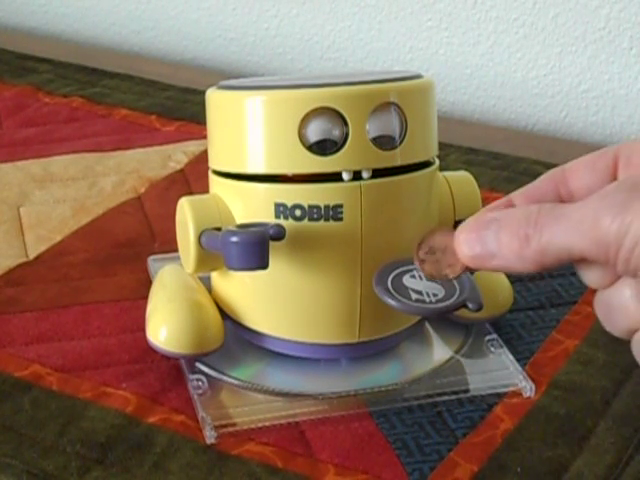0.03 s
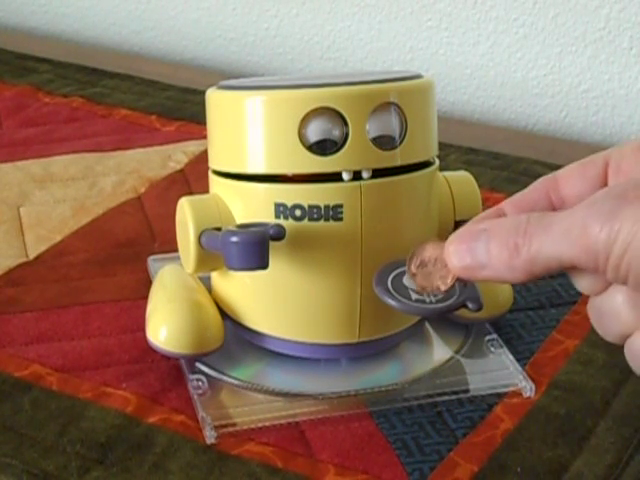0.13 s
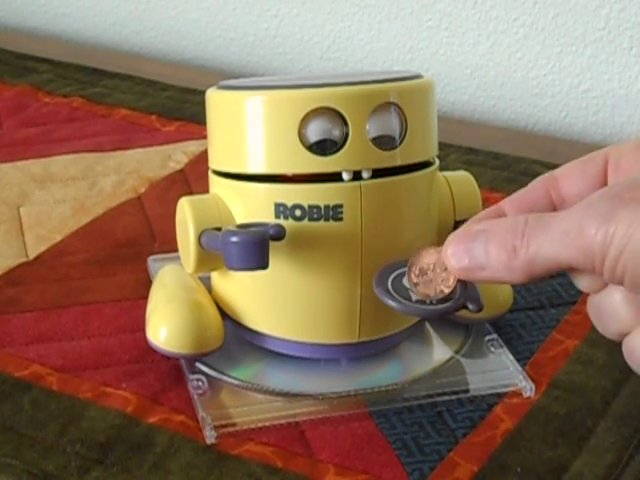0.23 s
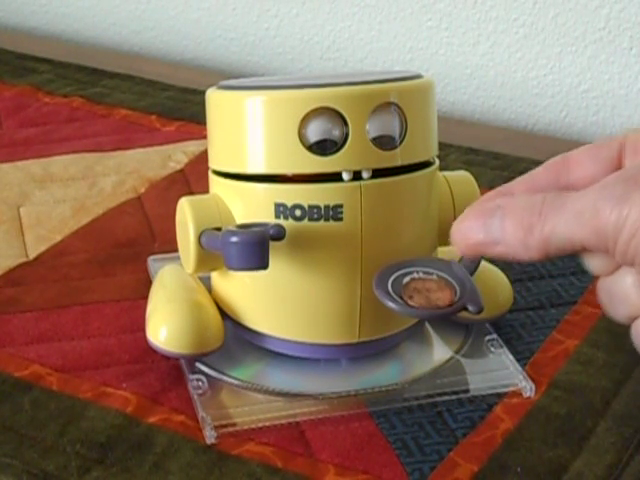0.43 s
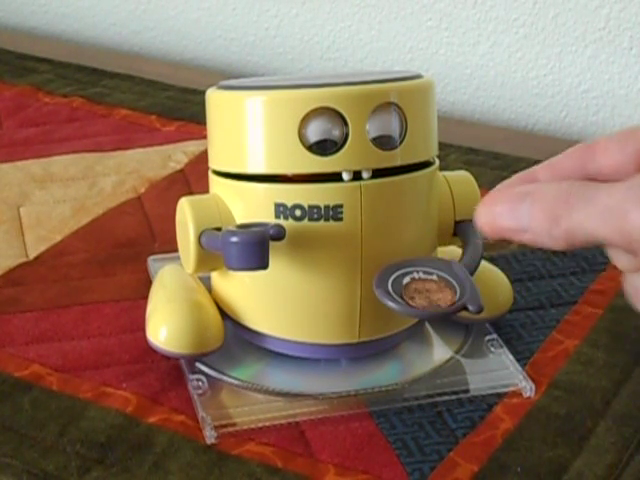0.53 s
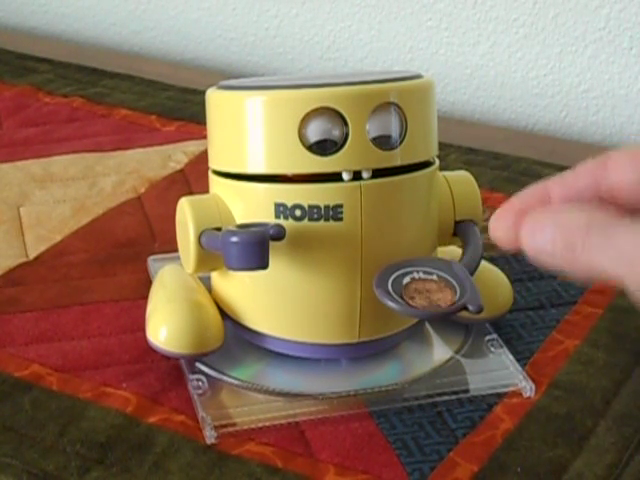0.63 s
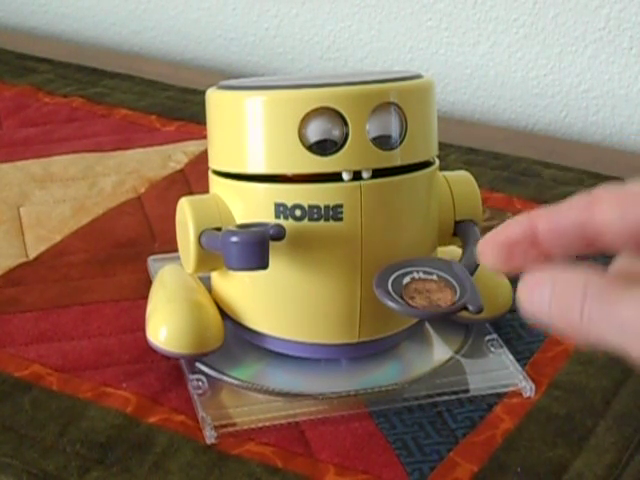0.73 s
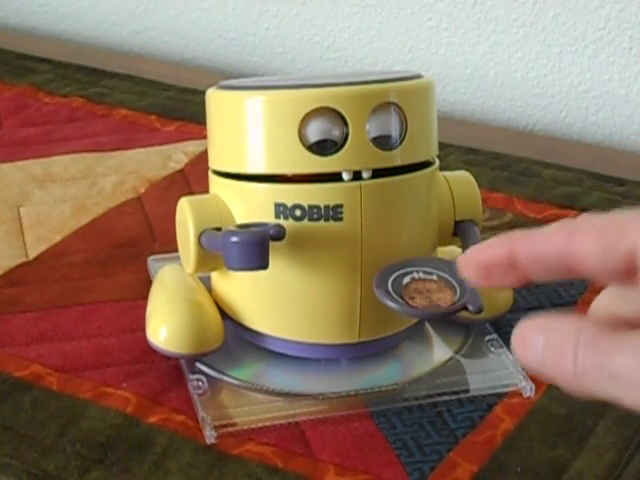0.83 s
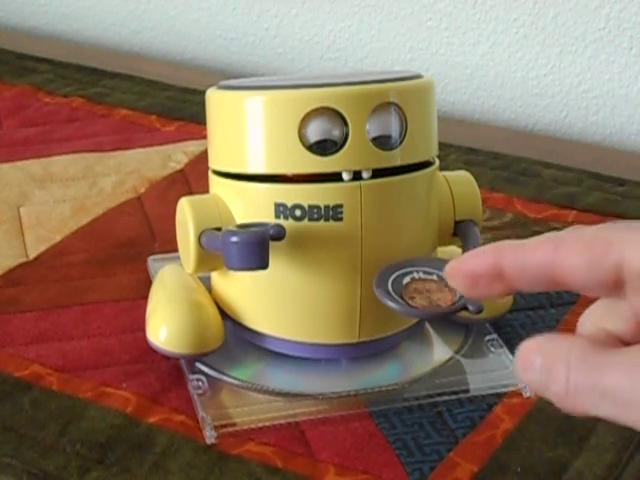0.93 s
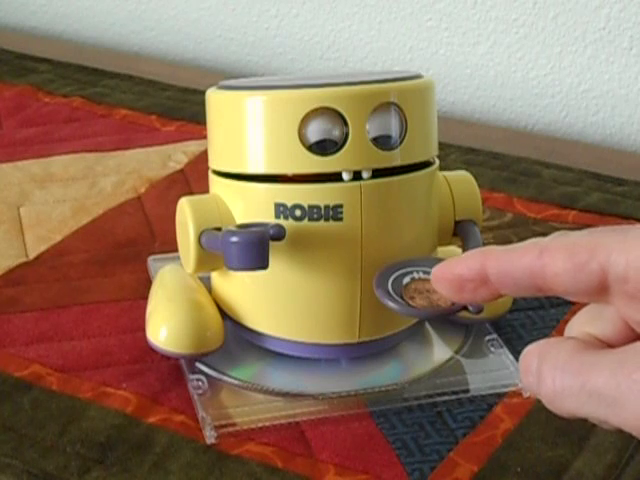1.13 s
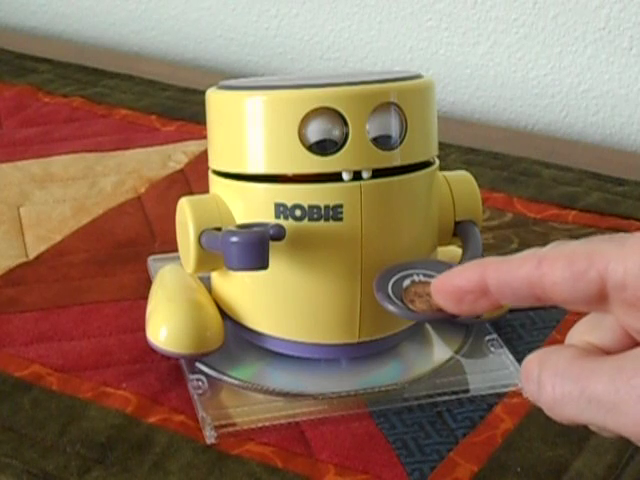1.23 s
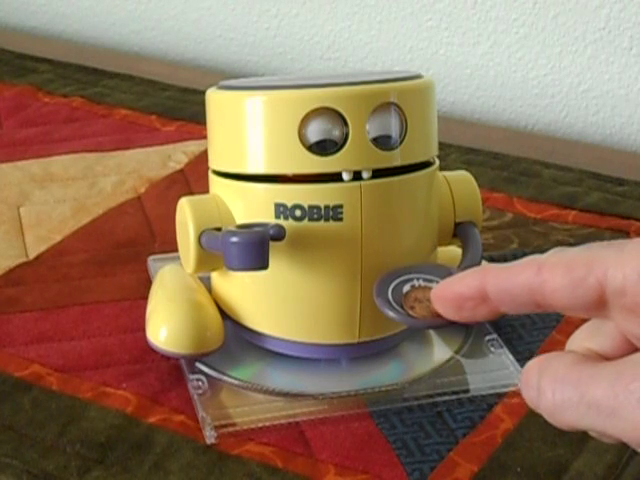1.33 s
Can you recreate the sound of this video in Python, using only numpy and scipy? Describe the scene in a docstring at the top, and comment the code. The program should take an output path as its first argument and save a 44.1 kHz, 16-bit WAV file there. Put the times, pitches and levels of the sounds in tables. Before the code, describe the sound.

Small coin clicks onto a plastic tray and rattles flat, with steady room hum and hiss.

```python
"""Coin on a toy tray

A small coin touches the plastic tray of a toy, is let go, clacks down and rattles flat in a small room.
Each contact is a crisp crack plus the short, bright ring of coin and tray modes. A bed of fan-like hum
and hiss sits underneath; gain control ducks it at the loudest clack and lets it creep back."""
import sys
import numpy as np
from scipy import signal
from scipy.fft import irfft
from scipy.io import wavfile
from scipy.ndimage import uniform_filter1d, minimum_filter1d

SR = 44100
rng = np.random.default_rng(int(sys.argv[2]) if len(sys.argv) > 2 else 0)


def wrap_up_sound(samples):
    """Save the sound to the file named by the first command line argument, as 16-bit audio."""
    columns = np.atleast_2d(samples).T
    # keep every value between -1 and 1, then stretch to whole-number steps
    tamed = np.clip(columns, -1, 1)
    steps = np.round(tamed * 32767).astype(np.int16)
    wavfile.write(sys.argv[1], SR, steps)


N = 61739

# spectral shape of the airy hiss: f/Hz, relative level/dB
HISS_SPECTRUM = [(25, -11), (50, -9.5), (75, -12), (130, -6.5), (190, -15), (235, -9), (300, -8),
                 (400, -12.5), (520, -14.5), (680, -20), (820, -21.5), (930, -17), (1050, -21.5),
                 (1360, -19.5), (1750, -20.5), (2100, -16), (2400, -26.5), (2800, -24.5), (3100, -35),
                 (3900, -30.5), (4500, -36), (7500, -34), (8600, -35.5), (9700, -31), (10800, -48)]
# narrow resonances that colour the hum: f/Hz, half-width/Hz, level/dB
HUM_BANDS = [(50, 4, -49.5), (139.5, 3.4, -48.5), (312, 19, -48), (358, 4.5, -45.5), (391.3, 7.6, -45.5),
             (467.4, 3.7, -45), (770, 19, -50), (939, 16, -50.5), (1338, 47, -48.5), (2046, 18.5, -44.5),
             (2230, 10, -48.5), (3840, 30, -60.5)]
# slow swell of the whole bed: t/s, level/dB
BED_SWELL = [(0, 0), (.22, -0.5), (.34, 0.5), (.58, -1), (.71, 2), (.9, -2), (1.06, 2), (1.2, -0.5),
             (1.4, -1)]
# main hits of coin on tray: t/s, relative level/dB, brightness/(dB per octave), low-mode knock/dB
COIN_HITS = [(0.2256, -7, -10.5, -6), (0.2271, -13.5, -6.5, 0), (0.2517, -21.5, -10, -3),
             (.354, -31, -7, 0), (.3749, -7.5, -3, 2), (.3795, -0.5, 4, -2.5), (.3842, -3, 6, -11),
             (.3857, 5.5, 0, 5), (.3950, 0, 2, 4), (.4092, -4.5, 17, -5), (.4114, -0.5, 9, -14),
             (.4160, -6.5, 0, -6), (0.4419, -2, -2, -6), (0.4434, -11, 4, 7), (0.4735, -4.5, 3, 6),
             (0.4831, -23, -5, -3), (.4960, -5.5, 0, 1), (.5047, -10, -7, -1), (.5140, -6, 22, -3),
             (0.5157, -7.5, -6, -2), (.5232, -10.5, -11, -10.5), (.5262, -13.5, -4, -8)]
# modes of the coin lying on the tray: f/Hz, relative level/dB, t60/s
RING_MODES = [(2126, -14, 0.025), (2458, -18.5, .025), (2766, -14.5, 0.013), (3657, -19, 0.014),
              (4600, -18, 0.024), (5463, -5.5, 0.013), (5720, -4, 0.033), (6150, 3.5, .015),
              (6400, -8, 0.024), (7555, -3, .015), (8360, -8.5, 0.018), (8940, -3.5, 0.013),
              (9770, -9.5, 0.028), (10550, -14.5, 0.025)]

TOP_HZ = 10800  # upper edge of the crack and of the whole mix


def undb(db):
    """Decibels to gain."""
    return 10 ** (np.asarray(db) / 20)


def unit(x):
    """Scale to rms 1."""
    return x / np.sqrt(np.mean(x ** 2))


def fade(t, t60):
    """Exponential decay, 60 dB down at t60."""
    return np.exp(-np.log(1000) * t / t60)


def noise(spectrum):
    """Noise of rms 1, coloured by an amplitude spectrum."""
    return unit(irfft(spectrum * np.exp(2j * np.pi * rng.random(len(spectrum))), N))


def room_tone(hiss_db=-30.5, fan_hz=257.3, fan_db=-32, waver_db=0.2, waver_hz=18):
    """The bed: broad air hiss, a resonant hum and a slightly wavering fan note, swelling together."""
    t = np.arange(N) / SR
    f = np.arange(N // 2 + 1) * SR / N
    hz, db = np.array(HISS_SPECTRUM).T
    hiss = undb(hiss_db) * noise(undb(np.interp(np.log(f + 1), np.log(hz), db)))
    hum = sum(undb(level) * noise(1 / (1 + ((f - centre) / width) ** 2))
              for centre, width, level in HUM_BANDS)
    waver = noise(f * np.exp(-f / waver_hz))  # random flutter, strongest around waver_hz
    fan = undb(fan_db + waver_db * waver) * unit(np.sin(2 * np.pi * fan_hz * t))
    swell = undb(np.interp(t, *np.array(BED_SWELL).T))
    return (hiss + hum + fan) * swell


def clack(bright_db_per_octave, knock_db, knock_below_hz=3200, crack_db=-6.5, attack_s=0.00022):
    """One contact at rms 1: a noise crack over ringing modes, with its own brightness and knock."""
    t = np.arange(SR // 20) / SR
    hz, db, t60 = np.array(RING_MODES).T
    db = db + knock_db * (hz < knock_below_hz)  # the tray's low modes give the knock
    # each contact lands on another spot, so mode pitches and levels scatter
    hz = hz * (1 + 0.011 * rng.standard_normal(len(hz)))
    db = db + 5 * rng.standard_normal(len(hz))
    tilt_db = bright_db_per_octave * np.log2(hz / hz.mean())
    phase = 2 * np.pi * (hz[:, None] * t + rng.random((len(hz), 1)))
    ring = undb(db + tilt_db) @ (np.sin(phase) * fade(t, t60[:, None]))
    crack_band = signal.butter(2, [3500, TOP_HZ], "band", fs=SR, output="sos")
    burst = unit(signal.sosfilt(crack_band, rng.standard_normal(len(t))))
    crack = undb(crack_db) * burst * fade(t, t60=0.01)
    return unit((ring + crack) * np.minimum(t / attack_s, 1))


def rim_chatter(start_s=0.394, end_s=0.49, count=56, jitter_s=0.001, calm_db=11, calm_s=0.047):
    """The rim ticks on the tray, calming as the coin settles: soft, dull hits, in rows like COIN_HITS."""
    jitter, scatter_db = rng.standard_normal((count, 2)).T
    times = np.linspace(start_s, end_s, count)
    calmed = 1 - np.exp(-(times - start_s) / calm_s)
    levels = -12.5 - calm_db * calmed + scatter_db
    return [(onset, db, -7, -4) for onset, db in zip(times + jitter_s * jitter, levels)]


def coin(level_db=-19, low_cut_hz=1100):
    """First touch, drop, bounces and the chatter between them; so small a body radiates no bass."""
    track = np.zeros(N)
    for onset, db, brightness, knock_db in list(COIN_HITS) + rim_chatter():
        hit = clack(brightness, knock_db)
        i = int(onset * SR)
        track[i:i + len(hit)] += undb(level_db + db) * hit
    return signal.sosfilt(signal.butter(2, low_cut_hz, "high", fs=SR, output="sos"), track)


def reflections(x, t60, predelay_s):
    """Diffuse echoes: a decaying noise tail of unit energy, opening after a pre-delay."""
    t = np.arange(N) / SR
    tail = rng.standard_normal(N) * fade(t, t60) * (t > predelay_s)
    return signal.fftconvolve(x, tail / np.linalg.norm(tail))[:N]


def gain_control(x, threshold_db=-17, start_cut_db=3.5, window_s=0.012, attack_s=0.015, release_db_per_s=7):
    """Ducking: the gain drops quickly by the excess over the threshold and recovers at a steady rate."""
    power = uniform_filter1d(x ** 2, int(window_s * SR))
    excess_db = np.maximum(10 * np.log10(np.abs(power) + 1e-12) - threshold_db, 0)
    recovery_db = release_db_per_s * np.arange(N) / SR
    cut_db = np.maximum.accumulate(np.maximum(excess_db + recovery_db, start_cut_db)) - recovery_db
    pole = np.exp(-1 / (attack_s * SR))
    return x * undb(-signal.lfilter([1 - pole], [1, -pole], cut_db))


def limiter(x, ceiling=0.98, samples=5):
    """A very fast gain dip holds each peak just under full scale."""
    allowed = ceiling / np.maximum(np.abs(x), ceiling)
    return x * uniform_filter1d(minimum_filter1d(allowed, samples), samples)


def scene():
    """Mono mix: the room bed, the coin and its near and far echoes."""
    direct = coin()
    early = undb(-9) * reflections(direct, t60=0.054, predelay_s=0.0014)  # toy body, table and wall
    late = undb(-10) * reflections(direct, t60=0.28, predelay_s=0.0051)  # the small room
    return (room_tone() + direct + early + late)[None]


def record(dry):
    """Master chain: gain control, peak limiter and a steep treble cut."""
    held = limiter(gain_control(dry[0]))
    treble_cut = signal.ellip(8, 0.1, 50, TOP_HZ, fs=SR, output="sos")
    return signal.sosfiltfilt(treble_cut, held)[None]


dry = scene()
out = record(dry)
wrap_up_sound(out)
```